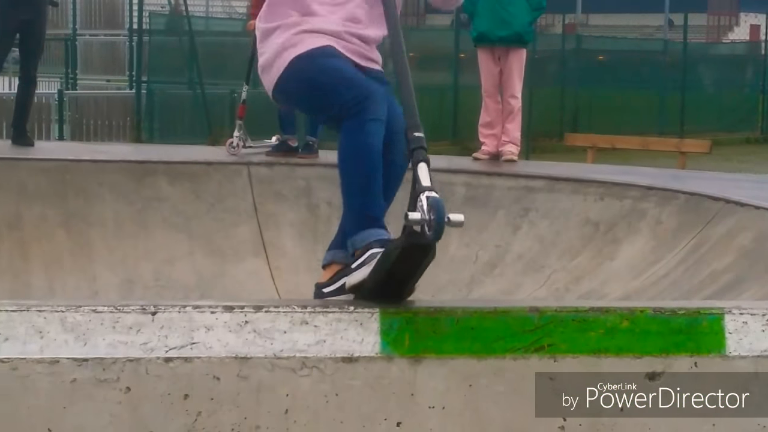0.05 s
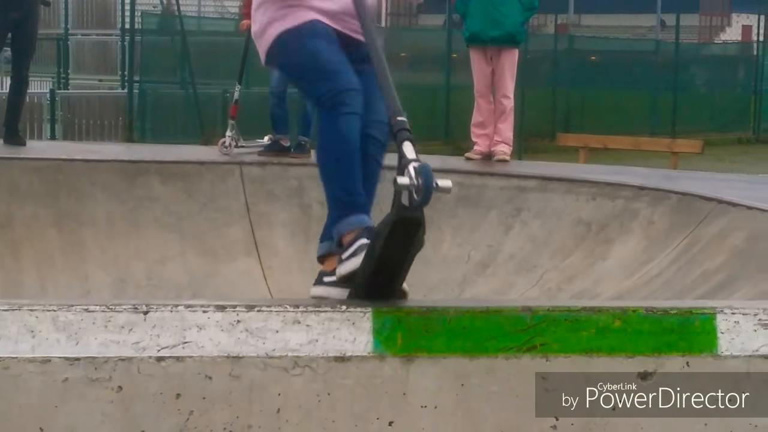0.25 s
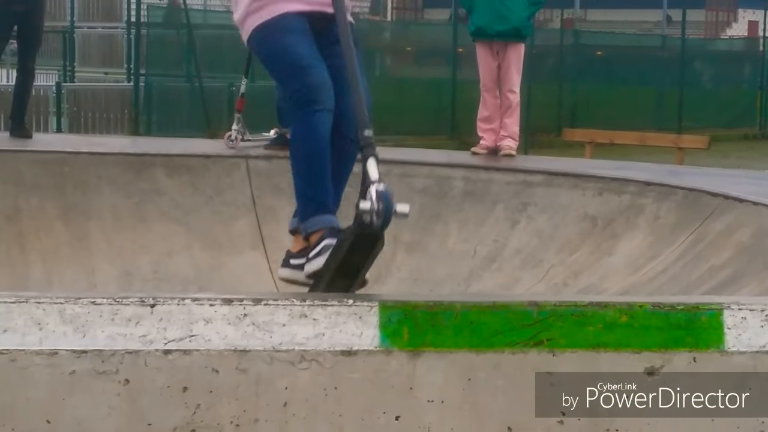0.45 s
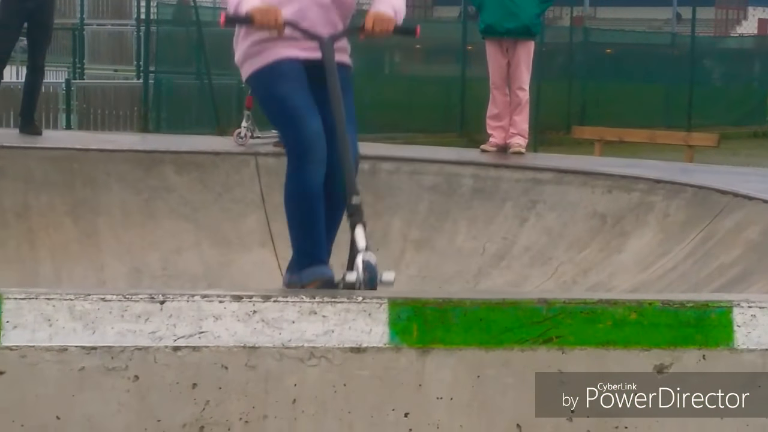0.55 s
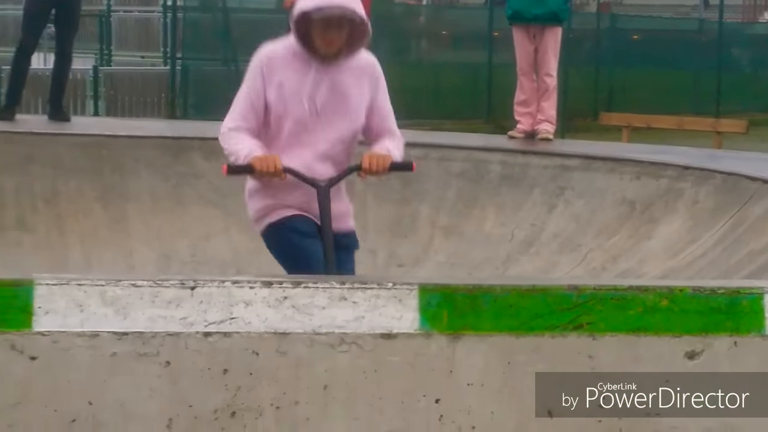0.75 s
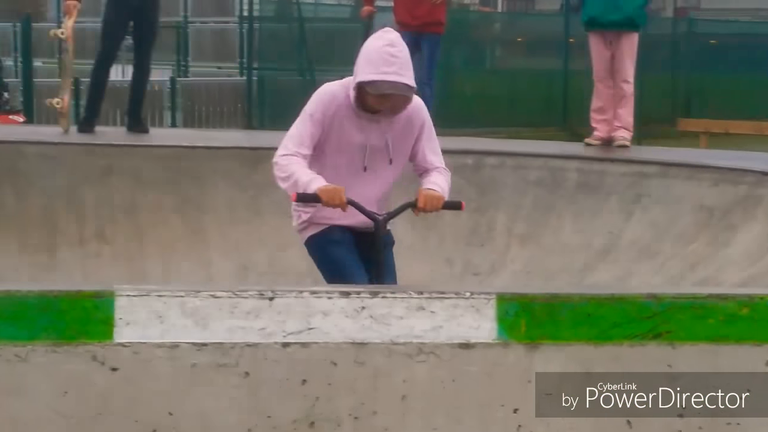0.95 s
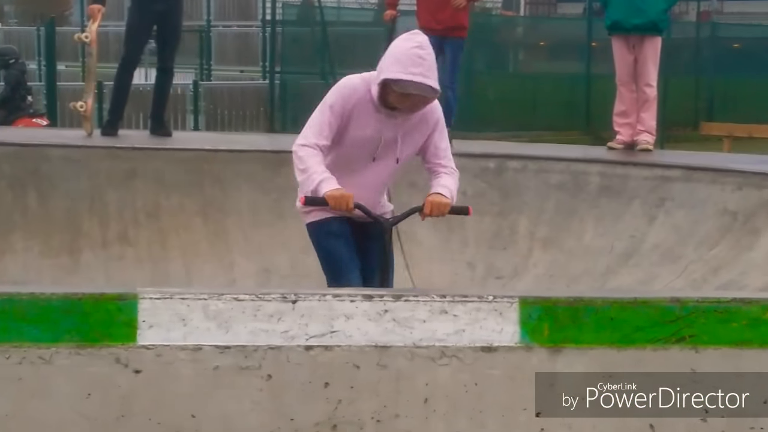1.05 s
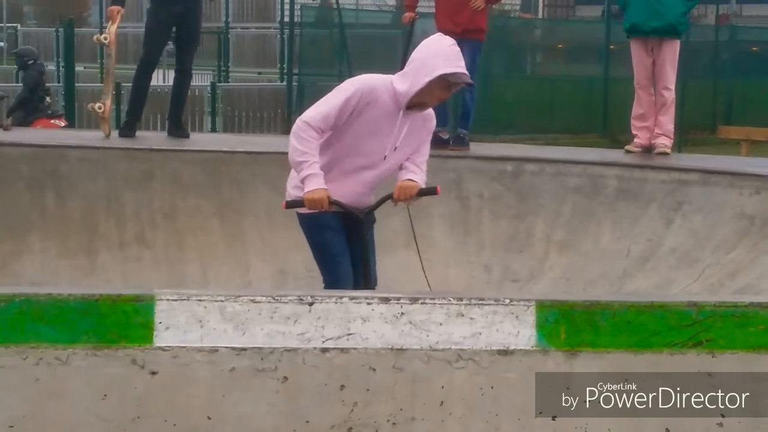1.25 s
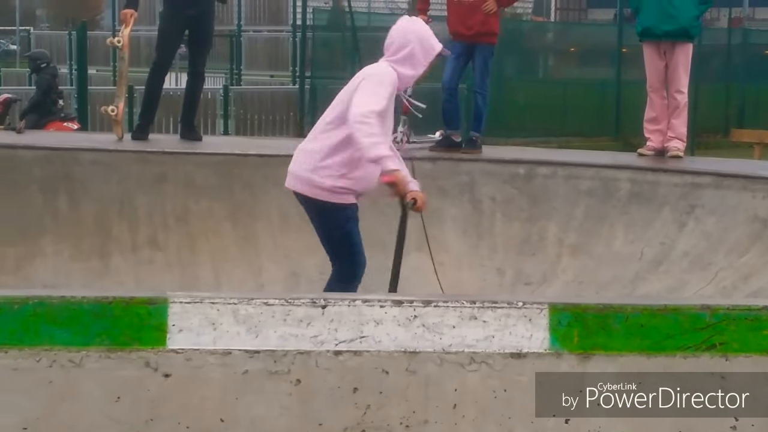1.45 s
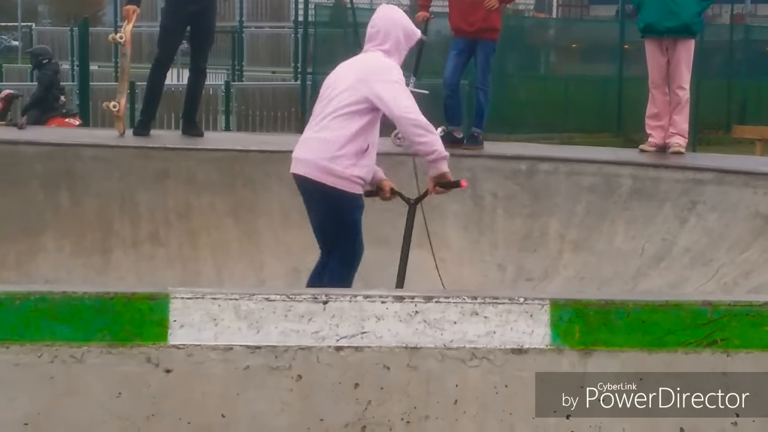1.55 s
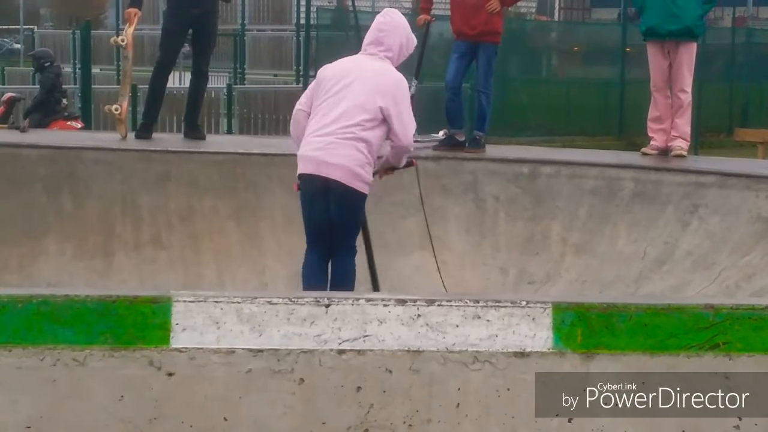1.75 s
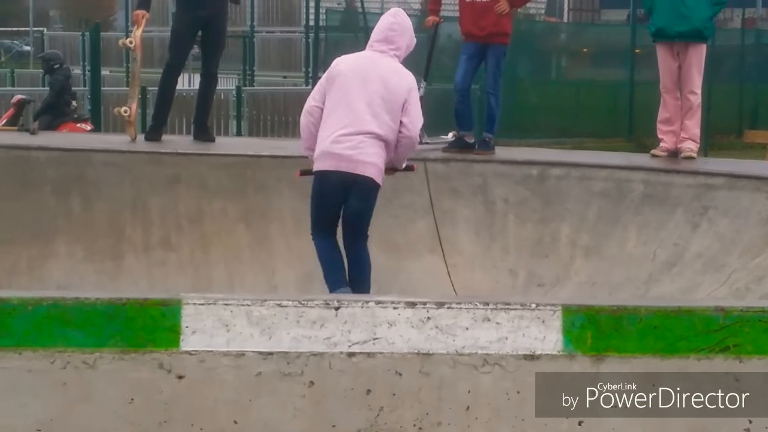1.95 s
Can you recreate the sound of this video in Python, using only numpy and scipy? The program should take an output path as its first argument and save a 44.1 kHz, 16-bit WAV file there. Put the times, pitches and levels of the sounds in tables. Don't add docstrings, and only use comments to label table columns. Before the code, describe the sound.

Loud woody crack of a scooter deck hitting concrete, a fast rattle and tail knock, short bowl reverberation and faint fence echo; then quiet foot and wheel knocks, slight rubbing, with low outdoor rumble, close stereo microphone.

```python
import sys
import numpy as np
from scipy import signal
from scipy.io import wavfile

SR = 44100
rng = np.random.default_rng(int(sys.argv[2]) if len(sys.argv) > 2 else 0)


def master(y):
    cut = np.clip(np.atleast_2d(y).T, -1, 1)
    pcm = np.round(cut * 32767)
    wavfile.write(sys.argv[1], SR, pcm.astype(np.int16))


def linear_from_db(decibels):
    return 10 ** (np.asarray(decibels, float) / 20)


N = 88200

# (t/s, peak level/dB, box pitch f/Hz, length/s)
CHATTER_TOUCHES = [
    (0.2206, 1, 1205, 0.0069),
    (0.2276, -14, 1150, 0.0056),
    (0.2306, -8.5, 1183, 0.006),
    (0.2366, -6, 1139, 0.0071),
    (0.2445, -10, 1150, 0.0064),
    (.2565, -25, 1100, .005),
    (0.263, -21.5, 1230, 0.01),
    (0.272, -27.5, 1170, 0.0083),
    (0.279, -24.5, 1150, 0.0073),
]
# (t/s, ring level/dB, crack level/dB, left-right level/dB, bowl level/dB)
TAIL_BOUNCES = [
    (0.2944, -9.5, -33, 1, -49.5),
    (0.348, -46, -51, -0.5, -63.5),
]
# (f/Hz, left-right level/dB)
SLAM_BALANCE = [(60, -8), (240, -3), (1200, -4.5), (2400, 4), (4400, 4), (8100, 1), (15000, -4)]
# (f/Hz, left-right level/dB)
AIR_BALANCE = [(60, -4.5), (240, -2.5), (950, -6.5), (3770, 5.5), (15000, 2.5)]


def rms_one(x):
    return x / np.sqrt(np.mean(x ** 2) + 1e-20)


def at_hz(points, hz):
    table = np.array(points)
    return np.interp(np.log(hz), np.log(table[:, 0]), table[:, 1])


def drift(rate):
    r = np.exp(-80 * np.pi * rate / SR)
    white = rng.standard_normal(N // 40 + 2002)
    slow = signal.lfilter([1], [1, -2 * r, r * r], white)[2000:]
    return np.interp(np.arange(N) / 40, np.arange(len(slow)), rms_one(slow))


def dying(start_s, t60, rise_s=.0003):
    out, first = np.zeros(N), int(np.ceil(start_s * SR))
    t = np.arange(first, min(N, first + int(1.5 * t60 * SR))) / SR - start_s
    out[first:first + len(t)] = np.minimum(t / rise_s, 1) * np.exp(-np.log(1000) * t / t60)
    return out


def ring(start_s, db, hz, t60, rise_s=.0005):
    out = dying(start_s, t60, rise_s)
    live = np.flatnonzero(out)
    out[live] *= linear_from_db(db) * np.sin(2 * np.pi * hz * (live / SR - start_s))
    return out


def loose(x):
    share = 0.27
    return x * (1 - share + share * drift(120))


def pan(db):
    return linear_from_db(np.array([[db / 2], [-db / 2]]))


def later(x, lag_s):
    n, half = np.arange(N), lag_s * SR / 2
    return np.array([np.interp(n - half, n, x[0]), np.interp(n + half, n, x[1])])


def banded_noise(spectrum, balance, patchy_db=1.0, shape=lambda hz: 1):
    # (f/Hz, likeness from 0 to 1)
    likeness = [(60, 0.6), (240, 0.79), (950, 0.3), (3770, 0.02), (15000, 0.02)]
    out, power, together = 0, 0, drift(2.5)
    edges = 22 * 2 ** np.arange(0, 9.9, .4)
    white = rng.standard_normal((2, 2, N))
    for k, (low, high) in enumerate(zip(edges, edges[1:])):
        hz = np.sqrt(low * high)
        if not spectrum[0][0] / 1.3 < hz < spectrum[-1][0] * 1.3:
            continue
        band = signal.butter(2, [low, high], "band", fs=SR, output="sos")
        mid, side = signal.sosfilt(band, white[k % 2])
        alike = np.clip(at_hz(likeness, hz), -1, 1)
        gain = linear_from_db(at_hz(spectrum, hz))
        power += gain ** 2 * (high - low) * 4 / SR
        flicker = linear_from_db(patchy_db * (.6 * together + drift(14)))
        stereo = np.sqrt(1 + alike) * mid + np.sqrt(1 - alike) * side * [[1], [-1]]
        out = out + gain * flicker * shape(hz) * pan(at_hz(balance, hz)) * stereo
    return out / np.sqrt(power)


def narrow_noise(bursts):
    out, grain = np.zeros((2, N)), linear_from_db(2 * drift(60))
    for start_s, length, hz, width_hz, db in bursts:
        band = signal.butter(2, [hz - width_hz / 2, hz + width_hz / 2], "band", fs=SR, output="sos")
        n = np.arange(int(start_s * SR), min(N, int((start_s + length) * SR)))
        white = rng.standard_normal((2, SR))[:, :len(n) + 1000]
        noise = rms_one(signal.sosfilt(band, white[0] + 0.78 * white)[:, 1000:])
        progress = np.clip((n / SR - start_s) / length, 0, 1)
        out[:, n] += linear_from_db(db) * noise * grain[n] * np.sin(np.pi * progress ** 0.62) ** .5
    return out


def surroundings():
    # (t/s, hiss level/dB, rumble level/dB)
    air = [(0.0, -57, -51), (0.19, -60, -60), (0.33, -58, -68), (0.37, -69, -68.5), (0.51, -66, -66),
           (0.68, -71, -70.5), (0.95, -68.5, -66), (1.3, -66, -66), (1.73, -61, -60.5), (1.84, -58.5, -56),
           (2.0, -54, -62)]
    # (f/Hz, level/dB per Hz)
    hiss = [(150, -35.5), (250, -1.5), (809, -12), (1180, -6.5), (1480, -11), (2400, -13), (2950, -18),
            (5790, -20), (15500, -26)]
    # (f/Hz, level/dB per Hz)
    rumble = [(12, -37), (20, 1), (54, -0.5), (117, -1.5), (184, -4.5), (400, -17.5), (520, -24.5),
              (880, -120)]
    s, hiss_db, rumble_db = np.transpose(air)
    t = np.arange(N) / SR
    hissing = linear_from_db(np.interp(t, s, hiss_db)) * banded_noise(hiss, AIR_BALANCE, patchy_db=1.18)
    rumbling = linear_from_db(np.interp(t, s, rumble_db)) * banded_noise(rumble, AIR_BALANCE, patchy_db=1.5)
    return hissing + rumbling


def bird_squeaks():
    # (t/s, length/s, start f/Hz, farthest f/Hz, level/dB)
    squeaks = [
        (.0, 0.0735, 3651, 3970, -60.5),
        (.078, 0.044, 3750, 3920, -72.5),
        (0.13, 0.04, 3900, 3960, -75),
        (0.159, 0.097, 3600, 4030, -62),
        (.372, 0.029, 4040, 4060, -59.5),
        (.66, 0.032, 3100, 2900, -72.5),
        (1.259, 0.035, 8580, 8300, -72.5),
    ]
    out, t, wobble, rough = 0, np.arange(N) / SR, drift(40), drift(70)
    for start_s, length, start_hz, far_hz, db in squeaks:
        progress = np.clip((t - start_s) / length, 0, 1)
        arch = np.sin(np.pi * progress)
        hz = start_hz + (far_hz - start_hz) * arch + 45 * wobble
        swell = arch ** 1.1 * (1 + .6 * rough)
        out = out + linear_from_db(db) * swell * np.sin(2 * np.pi * np.cumsum(hz) / SR)
    return out * pan(1.5)


def rubs():
    # (t/s, length/s, centre f/Hz, width/Hz, level/dB)
    bursts = [(.912, 0.041, 4750, 430, -67), (0.912, 0.036, 6370, 350, -74.5),
              (1.017, 0.045, 4450, 400, -71), (1.06, .042, 4450, 340, -73), (1.103, .038, 4490, 340, -71),
              (1.0, .15, 5950, 900, -78.5), (1.572, .02, 5770, 500, -67.5), (1.67, 0.041, 6300, 500, -74),
              (1.81, 0.22, 832, 260, -63), (.91, 0.19, 3500, 4100, -74), (.352, 0.016, 3130, 530, -53),
              (.885, 0.093, 530, 690, -64.5), (.0, .22, 3850, 300, -78), (1.244, 0.52, 8800, 10600, -76.5),
              (1.07, 0.026, 1157, 170, -65)]
    return narrow_noise(bursts)


def fence_echo():
    # (t/s, length/s, centre f/Hz, width/Hz, level/dB)
    echoes = [
        (0.298, 0.066, 1750, 500, -52),
        (.3, 0.078, 1210, 250, -53),
        (.38, 0.15, 1720, 734, -62),
        (0.401, 0.14, 1225, 235.8, -60.5),
        (.45, 0.47, 1750, 250, -74),
        (0.499, 0.36, 1200, 250, -75.5),
    ]
    return narrow_noise(echoes)


def knocks():
    # (t/s, peak level/dB, pitch f/Hz, t60/s)
    thuds = [
        (.553, -51, 111.2, 0.091),
        (0.671, -53, 70, 0.063),
        (.9130, -29.5, 258, 0.026),
        (0.9222, -34.5, 250, 0.067),
        (0.949, -46, 220, 0.095),
        (1.751, -58, 90, 0.06),
        (1.805, -40, 256, 0.035),
        (1.889, -37.5, 226, 0.041),
    ]
    # (t/s, peak level/dB, pitch f/Hz, t60/s, crack level/dB)
    ticks = [(.068, -61, 1420, 0.017, -62), (0.173, -72.5, 1488, 0.018, -56),
             (0.915, -49, 2185, 0.018, -50.5), (0.984, -57, 2000, .03, -54),
             (1.146, -55, 2800, 0.0094, -54), (1.697, -52, 1780, .015, -52.5),
             (1.871, -54, 1400, 0.014, -47), (1.8893, -31.5, 2590, 0.014, -35.5),
             (1.8893, -50, 14700, .012, -58), (1.8903, -46, 9800, .008, -60),
             (1.8900, -37.5, 1650, 0.012, -58), (1.8928, -34.5, 1253, 0.023, -41),
             (1.8924, -38.5, 810, 0.023, -63)]
    # (f/Hz, level/dB per Hz)
    tick_crack = [(59, -27), (100, 2), (552, -11), (1370, 2.5), (2990, -14.5), (4960, -13), (15500, -28.5)]
    ringing, spit = 0, 0
    for start_s, db, hz, t60, crack_db in ticks:
        ringing = ringing + ring(start_s, db, hz, t60)
        spit = spit + linear_from_db(crack_db) * dying(start_s, 0.023)
    out = loose(ringing)
    for start_s, db, hz, t60 in thuds:
        out -= ring(start_s, db, hz, t60, rise_s=0.002626)
        out -= ring(start_s, db - 1.5, hz * 0.66, t60, rise_s=0.0045)
    return out * pan(-3.5) + banded_noise(tick_crack, AIR_BALANCE) * spit


def bowl():
    # (f/Hz, level/dB per Hz)
    colour = [(60, -40.5), (110, -14), (385, -2), (810, -24.5), (1170, -8.5), (1630, -4.5), (2470, -17.5),
              (6710, -29), (15500, -52)]
    # (f/Hz, t60/s)
    lasting = [(80, 0.21), (300, 0.16), (700, .25), (1200, 0.36), (2000, 0.31), (4000, .35), (8000, .3),
               (14000, 0.33)]
    slam_db, late_db, late_stretch = -27, -19.5, 3.4
    blows = [(CHATTER_TOUCHES[0][0] + .003, slam_db)]
    blows += [(bounce[0], bounce[-1]) for bounce in TAIL_BOUNCES]

    def fall(hz):
        t60 = at_hz(lasting, hz)
        early = sum(linear_from_db(db) * dying(start_s, t60) for start_s, db in blows)
        return early + linear_from_db(slam_db + late_db) * dying(blows[0][0], late_stretch * t60)

    return banded_noise(colour, SLAM_BALANCE, shape=fall)


def tail_bounces():
    # (f/Hz, level/dB, t60/s)
    modes = [(1093, -19.5, 0.1), (1615, -7.5, 0.074), (1730, -0.5, 0.034), (1933, -9.5, .06),
             (2115, -16.5, 0.057), (3230, -11, 0.037), (4510, -15.5, 0.035), (5480, -29, 0.032),
             (6320, -30.5, .04)]
    # (f/Hz, left-right level/dB)
    balance = [(200, -3), (2400, -4), (4400, 14.5), (8100, 15.5), (15000, 11)]
    # (f/Hz, level/dB per Hz)
    crack = [(180, -53), (300, -4.5), (652, -19), (1750, 4), (2560, -26), (4570, -3.5), (6500, -11),
             (12700, -47), (15500, -58)]
    out = np.zeros((2, N))
    for hz, mode_db, t60 in modes:
        ringing = 0
        for start_s, db, _, side_db, _ in TAIL_BOUNCES:
            ringing = ringing + ring(start_s, db + mode_db, hz, t60) * pan(side_db + at_hz(balance, hz))
        out += loose(ringing)
    envelope = sum(linear_from_db(crack_db) * dying(start_s, 0.044) for start_s, _, crack_db, *_ in TAIL_BOUNCES)
    snap = envelope * banded_noise(crack, balance)
    return out + signal.sosfilt(signal.butter(2, 800, "high", fs=SR, output="sos"), snap)


def slam():
    # (f/Hz, level/dB, t60/s)
    deck = [(129.96, -22, .3), (250, -16.5, .22), (374, -9.5, 0.067), (511.6, -21, 0.2), (1030, -9.5, .095),
            (1148, -8, 0.23), (1290, -13.5, .12), (1508, -9, 0.16), (1727, -8.5, 0.1), (2000, -9, 0.052)]
    # (f/Hz, level/dB, t60/s)
    clank = [(2890, -14.5, .022), (3733, -12, 0.02), (4410, -12, 0.023), (1950, -12, .03),
             (2155, -17, 0.037), (10000, -30, 0.012), (12296, -24, 0.011), (14690, -32, .01),
             (5470, -26, 0.039), (6400, -26.5, .03), (1676.5, -9.5, 0.05), (11500, -32.5, 0.017)]
    # (f/Hz, level/dB per Hz)
    crack = [(59, -60), (100, -32), (601, -22.5), (956, -16), (1290, -1.5), (2370, -26), (4460, -21),
             (5070, -28), (15500, -46.5)]
    deck_db, crack_db, recrack_db = -10.5, -13, -4
    out, first, cracking = np.zeros((2, N)), CHATTER_TOUCHES[0][0], 0
    for start_s, db, hz, length in CHATTER_TOUCHES:
        t = np.maximum(np.arange(N) / SR - start_s, 0)
        swell = np.sin(np.pi * np.minimum(t / length, 1) ** .8) ** 1.6
        out -= linear_from_db(db) * swell * np.sin(2 * np.pi * hz * t) * pan(at_hz(SLAM_BALANCE, hz))
        touch_db = crack_db + db + recrack_db * (start_s > first)
        cracking = cracking + linear_from_db(touch_db) * dying(start_s + 0.0012, 0.016)
    for hz, db, t60 in deck:
        out += loose(ring(first, deck_db + db, hz, t60, rise_s=.0015)) * pan(at_hz(SLAM_BALANCE, hz))
    for hz, db, t60 in clank:
        out += ring(first + 0.0016, db, hz, t60) * pan(at_hz(SLAM_BALANCE, hz))
    return out + cracking * banded_noise(crack, SLAM_BALANCE)


def scene():
    background = later(surroundings() + knocks(), -.00016)
    faint = bird_squeaks() + rubs() + fence_echo()
    scooter = later(tail_bounces() + slam(), -.00013)
    return background + faint + bowl() + scooter


def top_cut(x):
    return signal.sosfilt(signal.butter(12, 16410, fs=SR, output="sos"), x)


def record(dry):
    x = signal.sosfilt(signal.butter(2, 47, "high", fs=SR, output="sos"), dry)
    top = .93
    x = top * np.tanh((np.abs(x) / top) ** 3) ** (1 / 3) * np.sign(x)
    x = signal.sosfilt(signal.ellip(8, .5, 60, 15700, fs=SR, output="sos"), x)
    return top_cut(x)


dry = scene()
out = record(dry)
master(out)
```